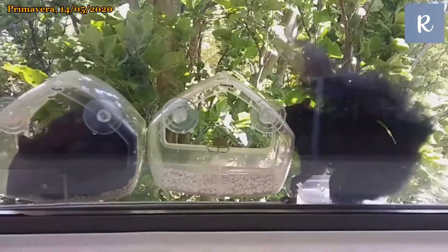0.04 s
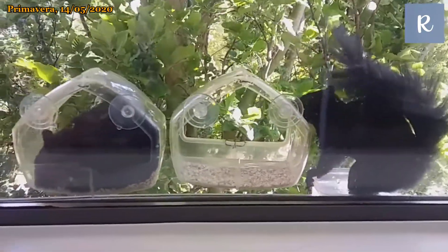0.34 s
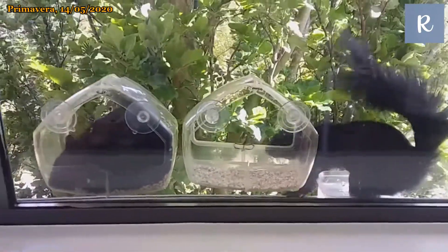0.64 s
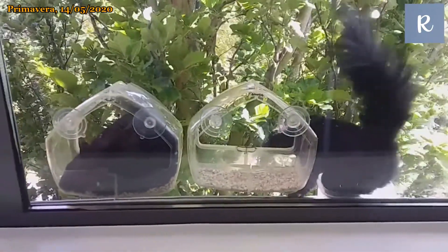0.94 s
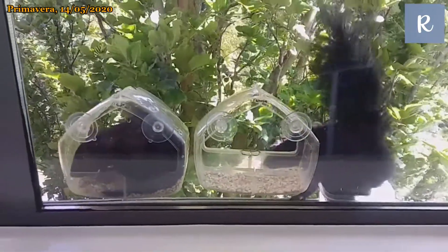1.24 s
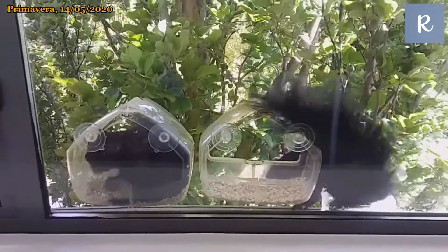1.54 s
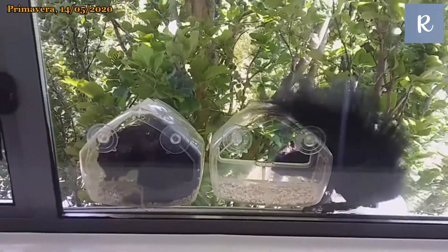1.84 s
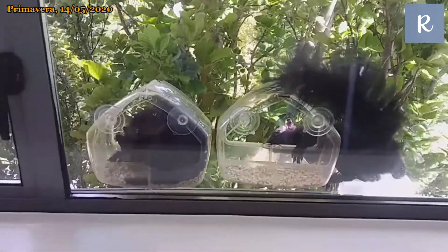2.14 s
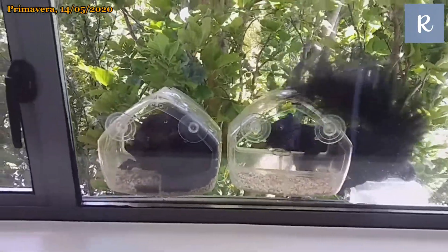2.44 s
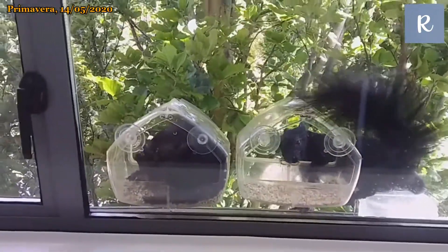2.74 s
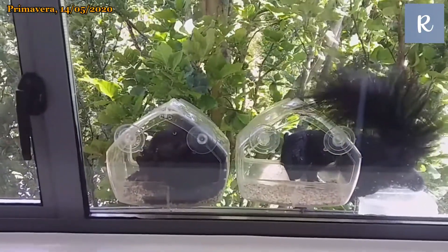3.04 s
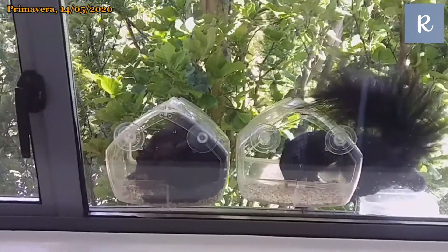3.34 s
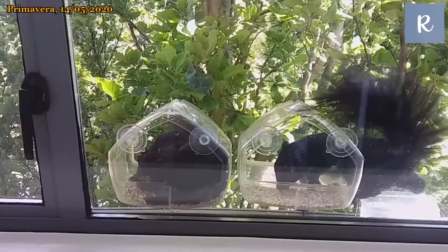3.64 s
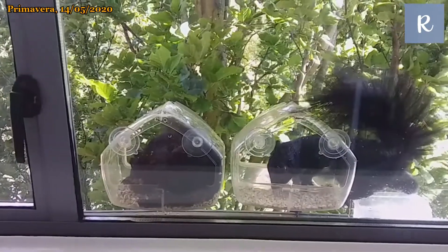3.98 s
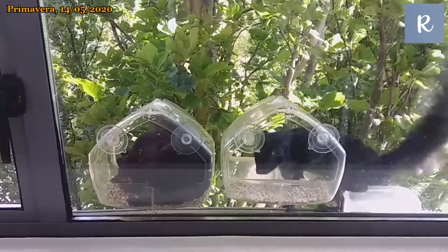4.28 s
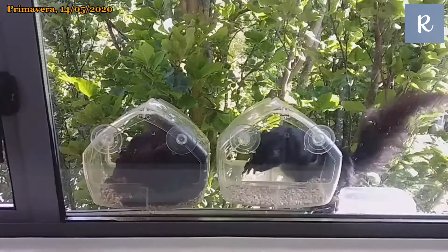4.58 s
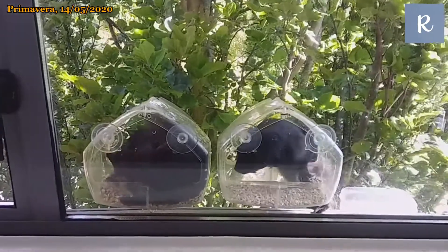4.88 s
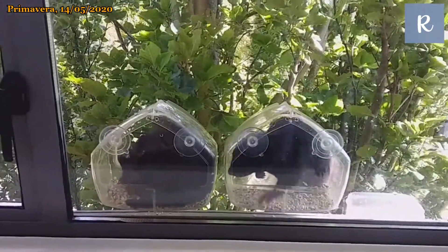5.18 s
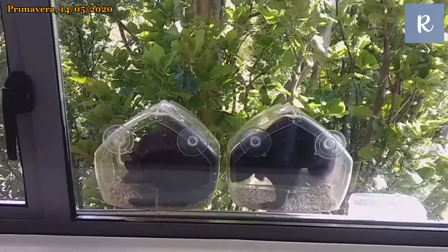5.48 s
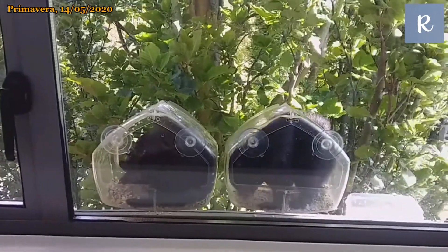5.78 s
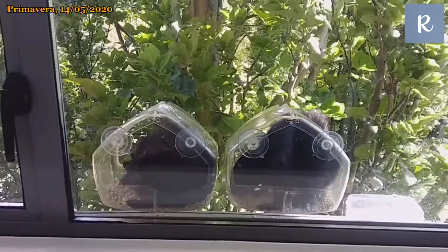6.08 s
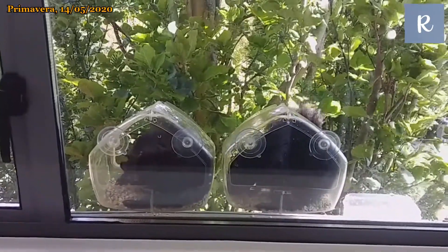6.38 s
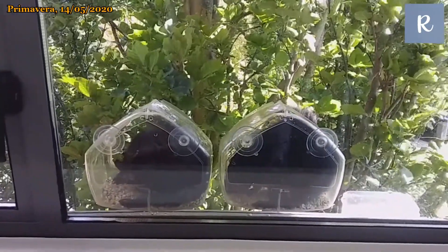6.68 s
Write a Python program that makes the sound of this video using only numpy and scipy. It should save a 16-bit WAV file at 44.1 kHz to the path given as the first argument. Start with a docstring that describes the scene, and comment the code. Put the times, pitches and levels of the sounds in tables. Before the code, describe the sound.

Two squirrels move about in plastic seed feeders on a window, heard from indoors. Faint, uneven seed rustle and a low murmur of the glass run over steady hiss and dull garden noise. From about 1 second, soft hollow thumps and light plastic clacks hit the pane, ringing briefly in the room and growing busier. Near 2 seconds claws scrape with two thin, high squeaks. The sound cuts out completely from 2.1 to 2.4 seconds, and a hard knock follows at 2.5. Quiet shuffling with a few tiny rubs continues until 4.3 seconds, when a quick run of booming knocks and clacks begins, loudest at about 4.6, with another bump at 4.9. Light taps, ticks and soft thuds come around 5.6 seconds and again between 6.1 and 6.4, as the rustle carries on to the end.

```python
"""Two squirrels clamber in plastic seed feeders held to a window by suction cups, heard from indoors.
Seed rustles over a steady hiss. From 1 s their weight excites the modes of the pane, and the shells clack
on the glass, ringing briefly in the room. Near 2 s claws scrape and squeak by stick-slip friction; then
the sound drops out for a third of a second. A hard knock follows, the loudest blows come near 4.6 s,
and light taps end the scene."""
import sys
import numpy as np
from scipy import signal
from scipy.fft import rfft, irfft, next_fast_len
from scipy.io import wavfile
from scipy.ndimage import map_coordinates

SR = 44100
rng = np.random.default_rng(int(sys.argv[2]) if len(sys.argv) > 2 else 0)


def store_pcm(level_fs):
    """Save levels as 16-bit WAV."""
    pcm = np.round(np.clip(level_fs, -1, 1) * 32767).astype(np.int16)
    wavfile.write(sys.argv[1], SR, np.atleast_2d(pcm).T)


N = 296203
TIME = np.arange(N) / SR
AGE = np.arange(SR) / SR  # time since a blow [s]


# weight landing on the pane: (time [s], level [dB], firmness [dB])
LANDINGS = [(0.979, -39.5, 19), (1.132, -31.5, -1.5), (1.297, -41.5, 12), (1.335, -32, -1), (1.4, -40, 9),
            (1.716, -32, 22), (1.838, -28, -16), (1.868, -31.5, 7.5), (1.944, -33, -3), (2.01, -33.5, -9),
            (2.05, -34, -9.5), (2.485, -23, 7.5), (2.568, -32.5, 9.5), (4.322, -34, -12), (4.409, -37, 6),
            (4.493, -17.5, 2), (4.558, -18.5, -3), (4.62, -12.5, 3), (4.681, -27, 12), (4.88, -32.5, -11),
            (4.938, -25.5, 2.5), (5.572, -39, -15), (5.66, -36.5, -14), (6.095, -34.5, -22)]
# modes of the loaded glass: (frequency [Hz], level [dB], T60 [s])
PANE_MODES = [(120, -8, .45), (146, 0, .46), (161, -4, .46), (194, 0, .42), (249, -2, .35), (267.5, 1, .48),
              (294, -1, .46), (349, -6, .35)]
# the room's answer to the pane: (frequency [Hz], spectral level [dB])
BOOM_SPECTRUM = [(30, -37.5), (60, -14), (100, -17), (150, -1), (290, -9.5), (380, -12), (480, -21.5),
                 (900, -60)]

def pane_thumps(level_db=-11.0, deep_hz=160, upper_hz=265, rise_s=0.0026):
    """Modal excitation through the suction cups: firm paws favour upper modes, a soft body deep ones."""
    out = np.zeros(N)
    for s, db, firmness in LANDINGS:
        loading_s = rise_s * 2 ** (-firmness / 10)  # 10 dB softer takes twice as long
        swell = 1 - np.exp(-AGE / loading_s)
        tilt = [(deep_hz, -firmness / 2), (upper_hz, firmness / 2)]
        modes = [(hz, level + along(tilt, hz), t60) for hz, level, t60 in PANE_MODES]
        pane = ring(modes, scatter_db=2.5, detune=0.0056)
        boom = room_decay(coloured(rng.standard_normal(SR), BOOM_SPECTRUM))
        boom = filtered(boom, lambda hz: amp(along(tilt, hz)))
        add(out, s, amp(db + level_db) * swell * (pane + amp(-5) * boom))
    return out


# a shell or claw striking: (time [s], level [dB], treble over bass [dB])
IMPACTS = [(0.978, -41, -30), (1.298, -41, -7), (1.335, -54, 9.5), (1.401, -47, -12.5), (1.717, -30, -9),
           (1.785, -48.5, 12), (1.894, -44.5, 7), (2.039, -38.5, 1.5), (2.478, -19, -3.5),
           (4.325, -41, -10), (4.491, -22.5, -10.5), (4.615, -18.5, -5.5), (4.931, -33, -13.5),
           (5.233, -58, 11), (5.58, -52, 8.5), (5.654, -52, 16.5), (6.344, -48, 10)]
HARD_DB = -21  # a blow above this rebounds

def shell_strikes(rebound_s=.008, gain_db=2.4, dull_db=-4, pressed_db=-7.5, free_db=7):
    """Contact damping and rebound: a pressed shell rings little, a rebounding one freely."""
    first = [(s, db, bright, pressed_db) for s, db, bright in IMPACTS]
    rebounds = [(s + rebound_s, db + gain_db, bright + dull_db, free_db)
                for s, db, bright in IMPACTS if db > HARD_DB]
    return first + rebounds


# modes of the plastic shell: (frequency [Hz], level [dB], T60 [s])
SHELL_MODES = [(529, -4, .25), (588, 0, .2), (680, -10, .22), (768, -6, .32), (920, -10, .25),
               (998, -11, .22), (1061, -7, .16), (1115, -7, .3), (1310, -6, .28), (1508, -10, .32),
               (1776, -12, .36), (1895, -11, .26), (1998, -8, .2), (2176, -9, .3), (2428, -11, .28),
               (3176, -14, .2), (3680, -11, .2), (4011, -14, .28), (4240, -13, .25), (4460, -13, .28)]
# its dense overtones: (frequency [Hz], spectral level [dB])
CLATTER_SPECTRUM = [(200, -21.5), (400, -10), (560, -2), (680, -7.5), (880, -13), (1080, -6.5), (1650, -9),
                    (2300, -10), (3040, -17.5), (4350, -12), (5100, -18), (6800, -19), (8800, -30.5),
                    (12000, -34), (16000, -81.5)]

def shell_clacks(bass_db=-10, treble_db=-10, split_hz=2800, chatter_s=0.004):
    """Impact excitation: a shell chatters on the glass, its clear modes amid dense overlapping ones."""
    out = np.zeros(N)
    direct = 1 + amp(-3) * np.exp(-AGE / 0.03)  # the first sound stands above the room's tail
    for s, db, bright, ring_db in shell_strikes():
        rise_s = chatter_s * 2 ** ((db - HARD_DB) / 19.5)  # lighter blows rise faster
        burst = unit_start(room_decay(coloured(rng.standard_normal(SR), CLATTER_SPECTRUM)))
        burst += amp(ring_db) * unit_start(ring(SHELL_MODES, scatter_db=2, detune=.002))
        bass = filtered(burst, lambda hz: 1 / (1 + (hz / split_hz) ** 8))
        clack = unit_start(direct * (1 - np.exp(-AGE / rise_s)) * bass)
        # hard claws favour the treble, which speaks first
        tick = unit_start(direct * (1 - np.exp(-2 * AGE / rise_s)) * (burst - bass))
        add(out, s, amp(db + bass_db) * clack)
        add(out, s, amp(db + bright + treble_db) * tick)
    return out


# claws sliding on the shell: (time [s], level [dB])
SCRAPE_ENVELOPE = [(1.89, -25), (1.894, -36), (1.904, -36), (1.992, -41), (2.062, -33), (2.09, -38)]
# their slips: (frequency [Hz], spectral level [dB])
SCRAPE_SPECTRUM = [(180, -34), (300, -3), (610, -14.5), (746, -16.5), (1490, -14), (2370, -9.5),
                   (2520, -14), (4400, -17.5), (6370, -21.5), (7440, -18), (8290, -25.5), (12000, -32),
                   (15600, -73), (22000, -120)]
# periodic slipping: (centre time [s], half length [s], slip rate [Hz], level [dB], jitter [fraction])
SQUEAKS = [(1.958, .03, 3850, -44.5, 0.03), (2.044, 0.037, 3680, -44, 0.02)]

def claw_scrape(scrape_db=-3, sag_hz_per_s=1800):
    """Stick-slip friction: claws skid on plastic in uneven slips that lock briefly into a thin squeak."""
    slips = coloured(in_room(grains(per_s=1500, spread_db=1), wet_db=0), SCRAPE_SPECTRUM)
    out = amp(envelope(SCRAPE_ENVELOPE) + scrape_db) * slips
    for s, half_s, hz, db, jitter in SQUEAKS:
        slip_hz = hz - sag_hz_per_s * (TIME - s)  # falls as the claw loses speed
        slip_hz *= 1 + jitter * wobble(700)
        phase = 2 * np.pi * np.cumsum(slip_hz) / SR
        tone = amp(-6) * np.sin(phase) + np.sin(2 * phase)
        stroke = np.exp(-((TIME - s) / half_s) ** 2)
        out += amp(db + 2.5 * wobble(200)) * stroke * tone
    return out * during(SCRAPE_ENVELOPE)


# brief resonances of the shell: (centre time [s], half length [s], frequency [Hz], level [dB])
BRIEF_RESONANCES = [(0.902, .05, 1290, -49), (1.403, 0.002, 726, -38.5), (1.895, 0.0015, 2050, -32.5),
                    (2.031, .044, 4450, -47), (2.061, .015, 1300, -38.5), (2.915, 0.018, 1400, -55),
                    (3.81, 0.01, 1170, -44.5), (3.986, 0.0065, 1130, -46.5), (4.343, 0.015, 3930, -55),
                    (4.628, .017, 1080, -28.5), (4.807, 0.019, 1420, -45.5), (5.66, .006, 6840, -43),
                    (5.68, .025, 4170, -51.5), (6.365, 0.027, 4200, -53)]

def shell_resonances(centre_over_half_width=9.2):
    """Resonant filtering: light rubs, short taps and the ring of knocks, each a narrow band of noise."""
    out = np.zeros(N)
    for s, half_s, centre_hz, db in BRIEF_RESONANCES:
        band = filtered(rng.standard_normal(SR),
                        lambda hz: 1 / (1 + (centre_over_half_width * (hz / centre_hz - 1)) ** 2))
        swell = np.exp(-((AGE - .5) / half_s) ** 2)
        band_rms = np.sqrt(np.average(band ** 2, weights=swell ** 2))
        add(out, s - .5, amp(db) * swell * band / band_rms)
    return in_room(out, wet_db=-7)


# how busily the animals shuffle, in three bouts of (time [s], effort [dB])
EFFORT_BOUTS = [
    [(0.0, -61), (0.046, -72), (0.074, -55.5), (0.424, -63.5), (0.574, -54), (0.692, -63.5), (0.948, -55),
     (1.68, -53.5)],
    [(2.7, -55), (3.18, -57), (3.552, -65), (3.572, -61), (4.076, -52), (4.102, -71), (4.204, -54.5),
     (4.46, -51)],
    [(5.06, -58), (5.142, -52.5), (5.192, -59), (5.214, -52), (5.448, -58), (5.612, -52.5), (5.762, -55),
     (6.7, -55.5)],
]

def shuffling(rumble_db=-50.5, rustle_db=3.5, usual_db=-55.5, fidget_db=1.63, flutter_db=0.77):
    """Random forcing: one feeding effort drives both the pane's murmur and the rustle of seed."""
    effort_db = envelope(np.vstack(EFFORT_BOUTS)) + fidget_db * wobble(7)
    rumble = amp(rumble_db + .9 * (effort_db - usual_db)) * pane_rumble()
    rustle = seed_rustle()
    return rumble + amp(effort_db + rustle_db + flutter_db * wobble(12)) * rustle


# the murmuring pane: (frequency [Hz], spectral level [dB])
RUMBLE_SPECTRUM = [(15, -50.5), (25, -25), (54, -9), (91, -2.5), (108, -6), (155, 4), (179, -2.5),
                   (246, 1.5), (448, -6.5), (700, -16.5), (910, -40), (1540, -120)]

def pane_rumble():
    """Forced vibration: the glass answers small random loads mainly at low frequencies."""
    return coloured(rng.standard_normal(N), RUMBLE_SPECTRUM)


# seed stirred in the trays: (frequency [Hz], spectral level [dB])
RUSTLE_SPECTRUM = [(260, -12), (450, -5.5), (687, -4), (747, -1.5), (870, -2.5), (1270, -4), (1550, -5.5),
                   (2260, -9.5), (2920, -11.5), (7500, -17.5), (9750, -25.5), (16500, -120)]

def seed_rustle(tick_db=-8):
    """Granular noise: countless contacts merge into a wash, with single seeds ticking in it."""
    ticks = unit(in_room(grains(per_s=70, spread_db=1), wet_db=4))
    return coloured(rng.standard_normal(N) + amp(tick_db) * ticks, RUSTLE_SPECTRUM)


# reverberation time of the room: (frequency [Hz], T60 [s])
ROOM_T60 = [(150, 0.93), (500, 0.57), (1500, 0.46), (4000, 0.42), (8000, 0.21), (14000, 0.11)]

def room_decay(x):
    """Absorption: each frequency falls 60 dB in its reverberation time."""
    hz, t, spectra = signal.stft(x, SR, nperseg=256)
    decay = amp(-60 * t / along(ROOM_T60, hz)[:, None])
    return signal.istft(spectra * decay, SR, nperseg=256)[1][:len(x)]


def in_room(x, wet_db):
    """Reverberation: the direct sound plus its convolution with a diffuse tail."""
    tail = room_decay(rng.standard_normal(SR))
    return x + amp(wet_db) * signal.fftconvolve(x, tail / np.linalg.norm(tail))[:N]


# garden noise and microphone hiss, each (frequency [Hz], spectral level [dB])
GARDEN_SPECTRUM = [(20, -40), (45, -26.5), (90, -11), (150, -17), (330, -2), (600, -6.5), (1300, -9.5),
                   (3000, -15), (7000, -21), (10000, -57)]
HISS_SPECTRUM = [(2000, -25), (5000, -8), (9000, -5.7), (11000, -4), (13000, -1.4), (15800, 1)]

def background(garden_db=-53.5, hiss_db=-55.3):
    """Stationary noise: the garden transmitted through the window, and the microphone's own hiss."""
    hiss = amp(hiss_db) * coloured(rng.standard_normal(N), HISS_SPECTRUM)
    return amp(garden_db) * coloured(rng.standard_normal(N), GARDEN_SPECTRUM) + hiss


def ring(modes, scatter_db, detune):
    """Free vibration: damped modes whose strength and tuning shift at random with the animal's seat."""
    hz, db, t60 = np.transpose(modes)[:, :, None]
    size, shift = rng.standard_normal((2, len(modes), 1))
    sign = (-1) ** np.arange(len(modes))[:, None]  # neighbouring modes start in opposite directions
    decay = amp(db + scatter_db * size - 60 * AGE / t60)
    return np.sum(sign * decay * np.sin(2 * np.pi * hz * (1 + detune * shift) * AGE), axis=0)


def grains(per_s, spread_db):
    """Poisson process: tiny contacts at random moments, mostly weak."""
    contacts = (rng.random(N) < per_s / SR) * rng.standard_normal(N)
    return contacts * amp(spread_db * np.minimum(rng.exponential(size=N), 3))


def amp(db):
    """Decibels to amplitude ratio."""
    return 10 ** (np.asarray(db) / 20)


def unit(x):
    """Normalise to rms 1."""
    return x / np.sqrt(np.mean(x ** 2) + 1e-20)


def unit_start(x):
    """Normalise a blow to rms 1 over its first 30 ms."""
    return x / np.sqrt(np.mean(x[AGE < .03] ** 2) + 1e-20)


def along(points, hz):
    """Interpolate (frequency [Hz], value) points on a log axis."""
    knots_hz, values = np.transpose(points)
    return np.interp(np.log(hz + 1), np.log(knots_hz + 1), values)


def envelope(points):
    """Interpolate (time [s], value) points at every sample."""
    return np.interp(TIME, *np.transpose(points))


def during(points, fade_s=0.002):
    """Gate: 1 while an envelope lasts, with soft edges."""
    return np.clip(np.minimum(TIME - points[0][0], points[-1][0] - TIME) / fade_s, 0, 1)


def wobble(knots_per_s):
    """Random modulation: a spline through Gaussian values."""
    knots = rng.standard_normal(int(N * knots_per_s / SR) + 4)
    return map_coordinates(knots, [TIME * knots_per_s])


def filtered(x, response):
    """Linear filtering: multiply the spectrum by a frequency response."""
    size = next_fast_len(len(x) + 8192)
    return irfft(rfft(x, size) * response(np.fft.rfftfreq(size, 1 / SR)), size)[:len(x)]


def coloured(x, spectrum):
    """Spectral shaping by (frequency [Hz], level [dB]) points, at rms 1."""
    return unit(filtered(x, lambda hz: amp(along(spectrum, hz))))


def add(track, s, sound):
    """Superpose a sound at s seconds."""
    part = track[round(s * SR):][:len(sound)]
    part += sound[:len(part)]


def scene():
    """Superposition: all sources sum at one microphone."""
    contacts = pane_thumps() + shell_clacks() + claw_scrape() + shell_resonances()
    return (contacts + shuffling() + background())[None]


def record(dry, dropout_s=(2.091, 2.423), top_hz=15980):
    """Gating and band limiting: the sound cuts out once, and a steep low-pass removes the top."""
    live = (TIME < dropout_s[0]) | (TIME > dropout_s[1])
    return filtered(dry[0] * live, lambda hz: np.clip((top_hz - hz) / 150, 0, 1))[None]


dry = scene()
out = record(dry)
store_pcm(out)
```